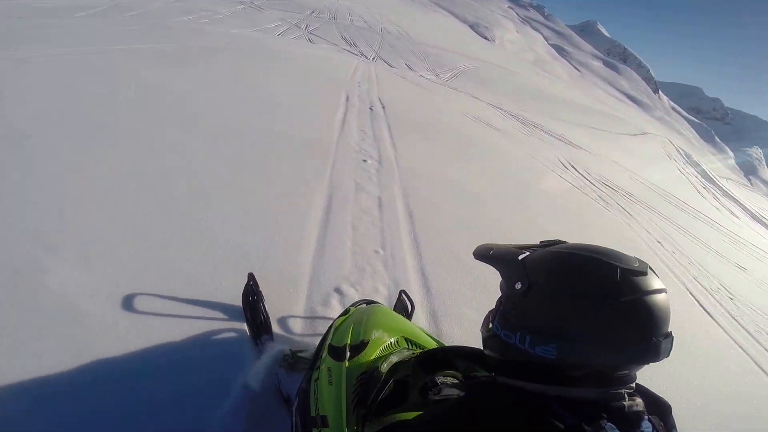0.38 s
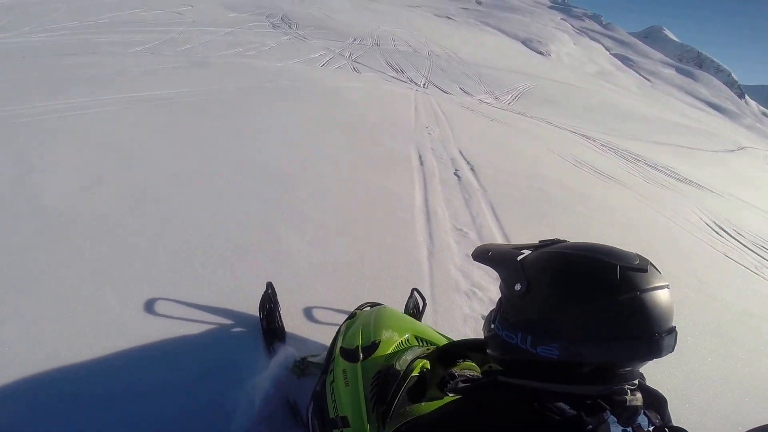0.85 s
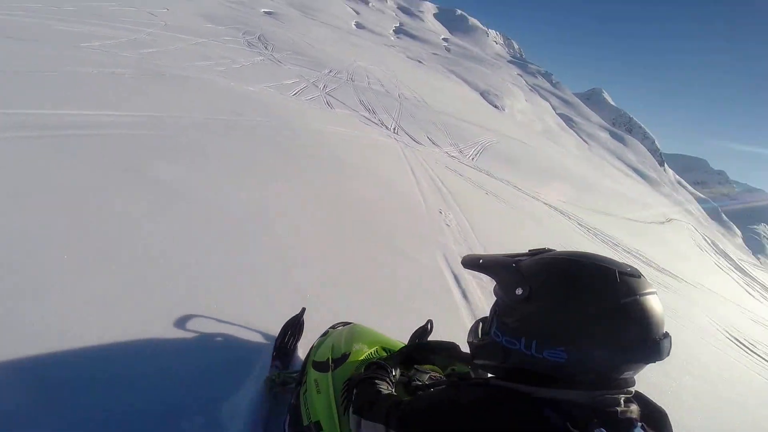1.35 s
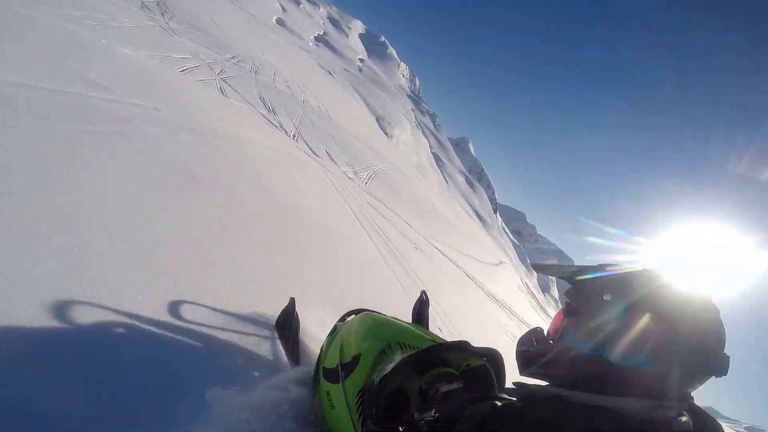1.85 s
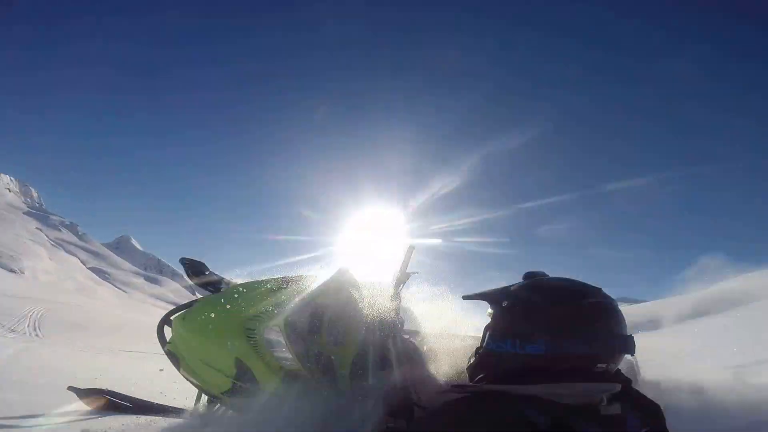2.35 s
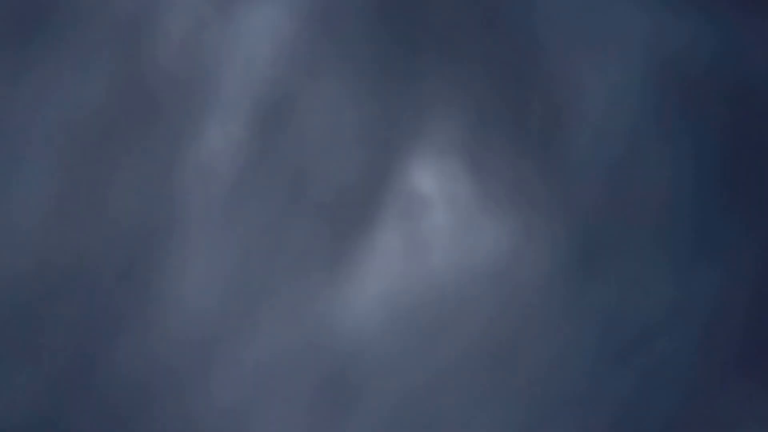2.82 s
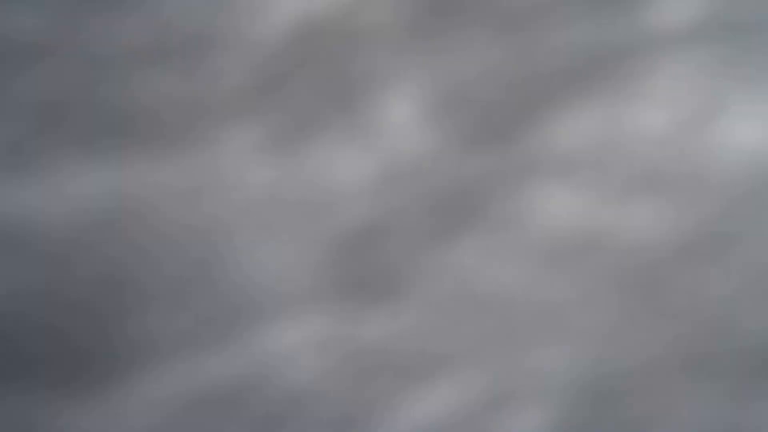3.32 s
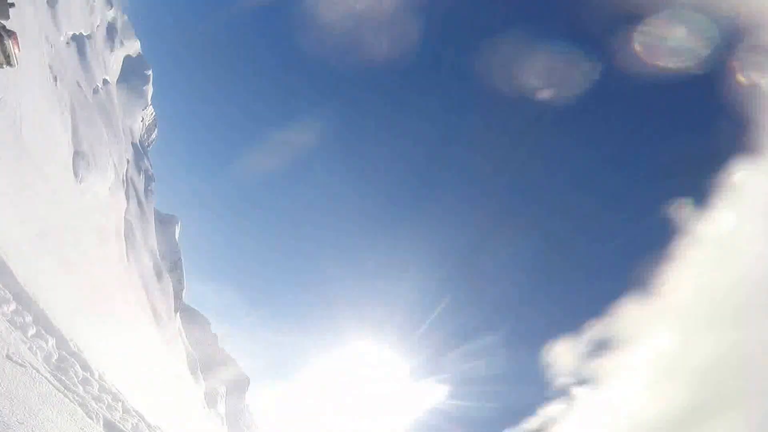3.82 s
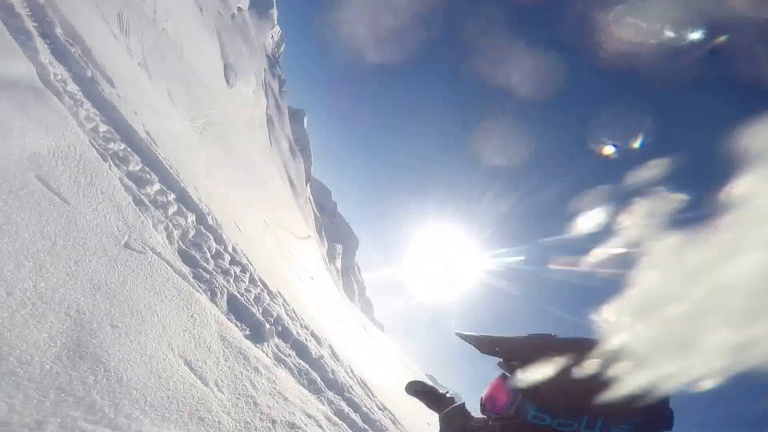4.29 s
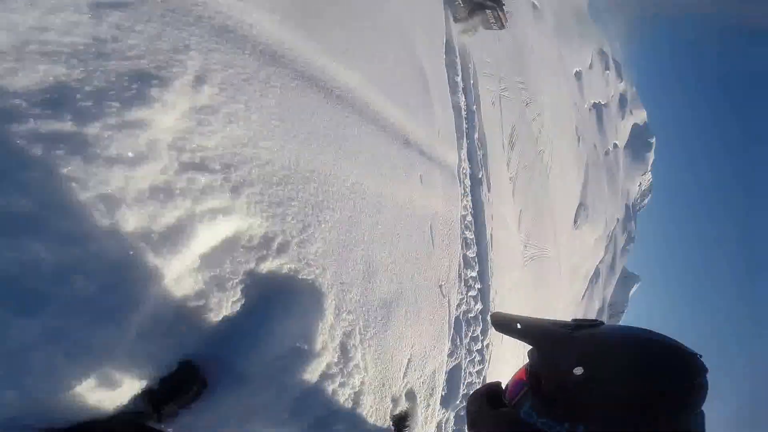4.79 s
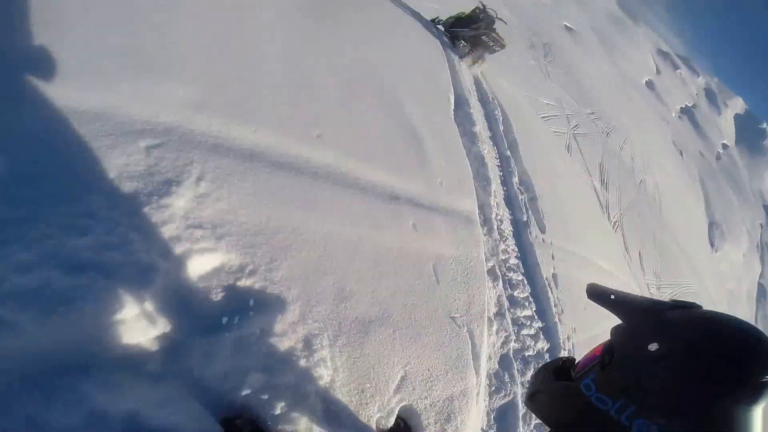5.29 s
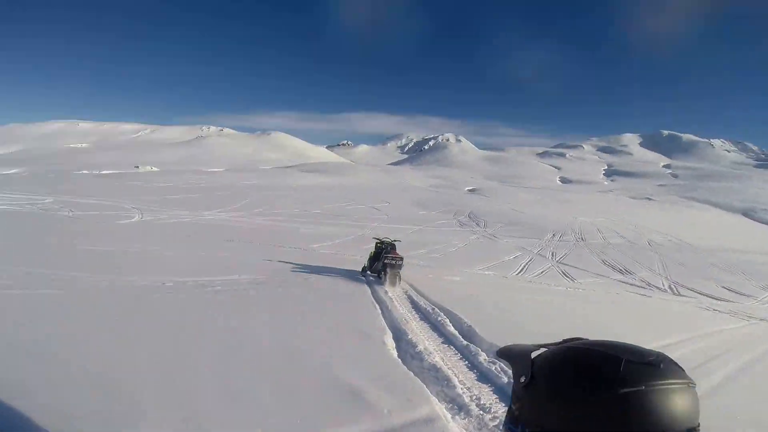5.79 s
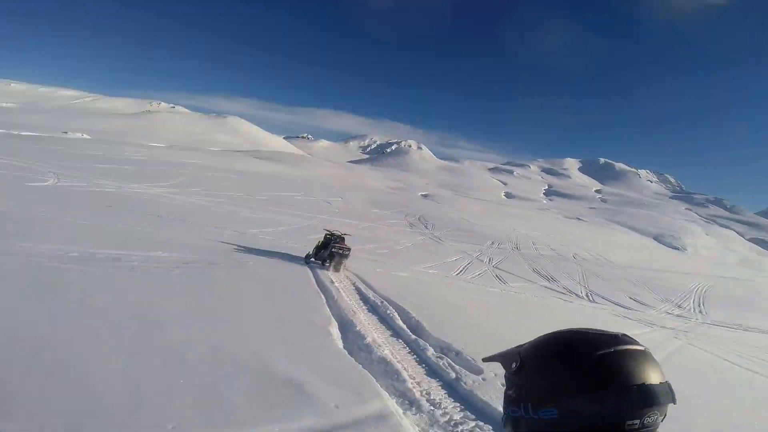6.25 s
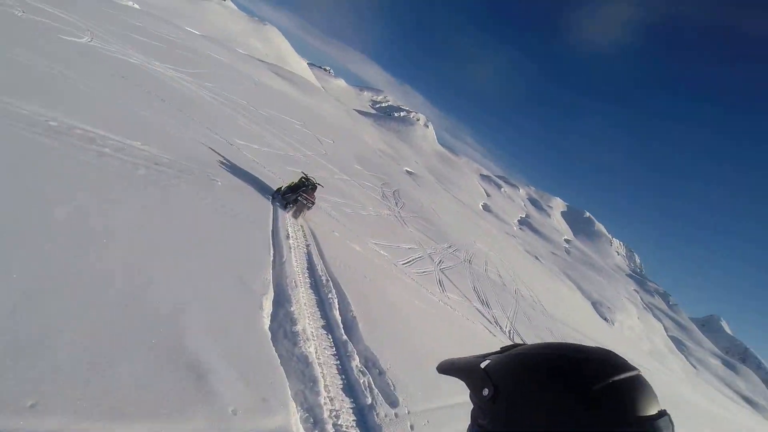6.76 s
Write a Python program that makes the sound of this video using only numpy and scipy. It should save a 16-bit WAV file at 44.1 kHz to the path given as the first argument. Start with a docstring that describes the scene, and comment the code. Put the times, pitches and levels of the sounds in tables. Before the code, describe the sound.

A snowmobile engine drones, then revs up hard before heavy blows and a scraping plunge into snow, followed by muffled rubbing, thuds and small ticks.

```python
"""An engine drones and revs up, blows and a scraping plunge into snow follow, then jolts, rubbing, creaks and ticks.
A small camera in a plastic housing rides on a snowmobile driver's back; the driver falls and it ploughs into snow.
The engine is a sum of crank orders with hiss; friction and jolts are grainy noise ringing resonant modes.
Ticks and blows are decaying sines, snow is coloured noise, and powder trickles off afterwards."""
import sys
import numpy as np
from scipy import signal
from scipy.fft import rfft, irfft, next_fast_len
from scipy.io import wavfile
from scipy.ndimage import uniform_filter1d

SR = 44100
rng = np.random.default_rng(int(sys.argv[2]) if len(sys.argv) > 2 else 0)


def store_pcm(level_fs):
    """Save levels as 16-bit WAV."""
    pcm = np.round(np.clip(level_fs, -1, 1) * 32767).astype(np.int16)
    wavfile.write(sys.argv[1], SR, np.atleast_2d(pcm).T)


def decibels_to_gain(level_db):
    """Convert a level in decibels to a linear amplitude gain (20 dB per decade)."""
    exponent = np.asarray(level_db, float) / 20
    return 10 ** exponent


N = 314419
T = np.arange(N) / SR

# the plunge into the snow: crushing begins, the microphone is stopped, it clears (s)
CRUSH_S, STOPPED_S, CLEAR_S = 2.572, 2.597, 2.622
# resonances of the camera mount: hz, width_hz, level_db (relative)
MOUNT_MODES = [(120.3, 59, -6), (212.7, 69, 1), (346.7, 62, -9), (533, 62, -13.5)]
# resonances of the plastic housing: hz, width_hz, level_db (relative)
HOUSING_MODES = [(445, 160, -11), (1110, 230, -9), (1480, 100, -5.5), (1960, 194, 0), (2208, 117, -2.5),
                 (2370, 140, 1), (2469, 310, -3.5), (2740, 1020, -11), (3790, 350, -15), (4630, 330, -15),
                 (5500, 400, -25.5), (9600, 900, -41)]


def evened(x):
    """Normalises the mean power: scales to rms 1."""
    return x / np.sqrt(np.mean(x ** 2) + 1e-20)


def coloured(x, points):
    """Spectral shaping: weights the spectrum by (Hz, dB) points on a log frequency axis, at rms 1."""
    point_hz, point_db = np.transpose(points)
    size = next_fast_len(len(x))
    hz = np.arange(size // 2 + 1) * SR / size
    weight_db = np.interp(np.log(hz + 1), np.log(point_hz + 1), point_db)
    return evened(irfft(rfft(x, size) * decibels_to_gain(weight_db), size)[:len(x)])


def ring(x, hz, width):
    """Damped resonance: one pole applied twice, so that the valleys between modes stay dark."""
    pole = np.exp((2j * np.pi * hz - np.pi * width) / SR)
    return 2 * signal.lfilter([(1 - abs(pole)) ** 2], np.poly([pole, pole]), x).real


def gritty(per_s, spread_db, smooth):
    """Granular excitation: random impulses of uneven size over a smooth share of noise."""
    sizes = decibels_to_gain(spread_db * np.minimum(rng.exponential(1, N), 4))
    grains = (rng.random(N) < per_s / SR) * sizes
    return evened(grains * rng.standard_normal(N)) + smooth * rng.standard_normal(N)


def lumps(hz, depth_db):
    """Random amplitude modulation: a gain gliding between hz random values a second."""
    steps = rng.standard_normal(1000)
    return decibels_to_gain(depth_db * np.interp(T * hz, np.arange(len(steps)), steps))


def played(tables):
    """Level envelope: joins tables of (s, dB) into a gain, silent outside each of them."""
    s, db = np.transpose(np.vstack(tables))
    inside = sum((T >= rows[0][0]) & (T < rows[-1][0]) for rows in tables)
    return decibels_to_gain(np.interp(T, s, db)) * uniform_filter1d(1. * inside, size=60)


def swells(rows, hold, peak_at=None):
    """Incoherent addition: rows swell and die, flatter with more hold; other columns blend by power."""
    start, length, db, *rest = np.transpose(rows)[:, :, None]
    if peak_at is None:
        peak_at = rest.pop(0)
    coarse = T[::64]
    warp = np.log(.5) / np.log(np.clip(peak_at, .05, .95))  # puts the peak at its share of the length
    phase = np.clip((coarse - start) / length, 0, 1) ** warp
    power = decibels_to_gain(2 * db) * np.sin(np.pi * phase).clip(0) ** (2 / hold) + 1e-12
    total = power.sum(0)
    curves = [np.sqrt(total)] + [(power * c).sum(0) / total for c in rest]
    return [np.interp(T, coarse, c) for c in curves]


def strokes():
    """Sliding contact: pressure and brightness of the rubbing, over a light touch after the plunge."""
    # strokes of clothing and snow along the housing:
    # start_s, length_s, level_db, peak_at (share of the length 0-1), tilt_db (brightness per octave)
    rubs = [(1.98, 0.29, -30.5, 0.51, 0), (2.24, 0.24, -36.5, 0.48, -6), (2.455, 0.044, -20.5, 0.51, 2),
            (2.49, 0.093, -22, 0.3, 1), (3.42, 0.29, -43, 0.32, 7.5), (3.74, 0.087, -39.5, 0.73, 8),
            (3.83, 0.16, -38, 0.43, 3), (4.01, 0.16, -36, 0.56, -0.5), (4.17, 0.27, -30.5, 0.62, 2),
            (4.47, 0.19, -41.5, 0.45, -6), (4.64, 0.29, -45.5, 0.42, -4), (4.79, 0.16, -39.5, 0.51, -1),
            (4.94, 0.21, -36.5, 0.5, 4), (5.3, 0.2, -45, 0.39, -4), (5.46, 0.18, -38, 0.62, -11.5),
            (5.53, 0.15, -27.5, 0.57, 3.5), (5.63, 0.14, -29, 0.6, 3), (5.76, 0.86, -43, 0.25, -3.5),
            (5.96, 0.22, -29.5, 0.3, -1), (6.203, 0.15, -36.5, 0.04, 0), (6.24, 0.31, -29.5, 0.62, 0.5),
            (6.5, 0.18, -35.5, 0.56, -1.5), (6.71, 0.14, -44, 0.77, 1), (6.92, 0.19, -37, 0.69, 0)]
    touch_tilt_db = -3  # per octave
    level, tilt_db = swells(rubs, hold=0.89)
    touch = decibels_to_gain(-51.5) * (T > CLEAR_S)
    stroke_share = level ** 2 / (level ** 2 + touch ** 2)
    return np.hypot(level, touch), touch_tilt_db + (tilt_db - touch_tilt_db) * stroke_share


def plough_pressure():
    """Contact pressure: the gain with which the camera ploughs through snow."""
    # how hard it ploughs: time_s, level_db
    plough_levels = [(2.604, -82), (2.62, -24), (2.624, -24), (2.74, -24), (2.81, -20), (2.96, -14),
                     (3.13, -18), (3.15, -33), (3.17, -21), (3.27, -16.5), (3.375, -16), (3.39, -25.5),
                     (3.5, -33.5), (3.54, -47)]
    return played([plough_levels])


def self_noise():
    """Electronic noise floor: steady whine tones over coloured hiss."""
    # camera electronics: hz, level_db (rms, before any later sinking)
    whine_tones = [(8780, -81), (11705, -81), (14626, -85)]
    # spectrum of the hiss: hz, level_db (relative, per Hz)
    floor_tone = [(300, 14.5), (3000, -24), (8000, -17), (12000, -21), (15000, -31), (15600, -60)]
    whine = sum(decibels_to_gain(db) * np.sqrt(2) * np.sin(2 * np.pi * hz * T) for hz, db in whine_tones)
    return whine + decibels_to_gain(-54.5) * coloured(rng.standard_normal(N), floor_tone)


def engine():
    """Harmonic synthesis: wavering crank orders through pipe resonances, and hiss that puffs once a turn."""
    # running of the engine: time_s, crank_hz, gain_db (of the summed orders), throttle (0-1)
    engine_run = [(0, 75.1, -54, 0.36), (.73, 73.5, -54.5, 0.3), (.85, 72.2, -59, 0.0),
                  (1.1, 67.9, -58, 0.1), (1.42, 68.5, -58, .3), (1.619, 73.3, -45.5, 0.95),
                  (1.75, 80.25, -47, 0.92), (1.85, 88.8, -52.5, 0.77), (1.951, 94.1, -47, 0.89),
                  (2.04, 96.8, -50, 1), (2.1, 94.2, -83, 0.57)]
    # exhaust note: order (multiple of the crank rate), level_db (relative)
    order_levels = [(1, -5.5), (2, 9.5), (3, 3), (4, 5.5), (5, -5.5), (6, -2), (7, -8.5), (8, 1.5),
                    (9, -10), (10, -16), (11, -3), (12, -7.5), (13, -12), (14, -13), (15, -18), (16, -11.5)]
    # the exhaust pipe favours one region: hz, gain_db
    pipe = [(70, 13.5), (250, -5), (350, 8.5), (450, 8), (520, 0), (620, -16), (900, -17.5)]
    # an open throttle drives pipe and airbox into resonance: hz, gain_db (added at full throttle)
    open_pipe = [(120, -11.5), (250, -4), (380, -1.5), (470, 6), (600, 5), (900, 0), (1120, 36), (1500, 18)]
    # spectrum of the hiss: hz, level_db (relative, per Hz)
    hiss_tone = [(400, -10), (1300, -7), (1620, 1.5), (1970, -7), (2480, -0.5), (2800, -7.5), (4650, -3),
                 (5400, -12), (6500, -10.5), (7400, -23), (9500, -19.5), (10800, -30), (15000, -38.5),
                 (15600, -81)]
    # hiss of intake, belt and track, near and later running away: time_s, level_db (before a 7.5 dB lift)
    roar = [
        [(0.0, -43.5), (0.49, -42.5), (1.35, -47.5), (1.71, -42.5), (1.93, -36.5), (2.18, -42.5), (2.45, -42.5),
         (2.57, -57)],
        [(3.62, -65.5), (4.23, -61), (7.13, -70)],
    ]
    s, *columns = np.transpose(engine_run)
    crank_hz, note_db, throttle = (np.interp(T, s, c) for c in columns)
    turns = np.cumsum(crank_hz * lumps(hz=35, depth_db=.055)) / SR  # uneven firings shake the speed
    note = np.zeros(N)
    for order, db in order_levels:
        order_hz = order * crank_hz
        pipe_db = np.interp(order_hz, *np.transpose(pipe))
        pipe_db += throttle * np.interp(order_hz, *np.transpose(open_pipe))
        wave = np.sin(2 * np.pi * (order * turns + rng.random()))
        note += decibels_to_gain(db + pipe_db) * lumps(hz=21.96, depth_db=3) * wave
    puffs = 1 + 0.1 * np.cos(2 * np.pi * turns) * (T < CRUSH_S)
    hiss = coloured(gritty(6000, 0.63, 0.95), hiss_tone) * puffs * lumps(hz=30.7, depth_db=0.86)
    return decibels_to_gain(note_db) * note + played(roar) * hiss * decibels_to_gain(7.5)


def creaks():
    """Stick-slip: quick uneven slips of a strap ring its buckle; fine ice fizzes with them."""
    # creaks: start_s, length_s, level_db (lower buckle mode), upper_db and fizz_db (over that mode)
    creak_rows = [(5.082, 0.076, -61.5, 14, -1), (5.77, 0.15, -49, -9, -43), (6.497, 0.02, -49, 16, -10)]
    # lower and upper mode of the buckle: hz, width_hz
    buckle_modes = [(1458, 15), (3736, 280)]
    level, upper_db, fizz_db = swells(creak_rows, peak_at=0.3, hold=1.9)
    slips = gritty(500, 3., .3)
    low, upper = (evened(ring(slips, hz, width)) for hz, width in buckle_modes)
    fizz = evened(ring(gritty(3000, 4.6, 0.39), hz=12600, width=1800))
    return level * (low + decibels_to_gain(upper_db) * upper + decibels_to_gain(fizz_db) * fizz)


def jolts():
    """Forced vibration: lumpy low thuds and steady shaking; the same lumps swell the ringing of the mount."""
    # jolts through the mount: start_s, length_s, thud_db, ring_db (mount over the thud)
    jolt_rows = [(.38, 0.069, -32.5, -25), (.57, 0.16, -36, -6.5), (.78, 0.21, -31.5, -10.5),
                 (1.0, 0.1, -34, -14), (1.25, 0.23, -30.5, -39), (1.39, 0.077, -21, -15),
                 (1.46, 0.075, -30, -21), (1.92, 0.069, -34.5, 5), (2.1, 0.22, -25.5, -8),
                 (2.28, 0.16, -18, -9.5), (2.42, 0.17, -14.5, -14), (2.57, 0.047, -18.5, 9),
                 (2.84, 0.041, -15, -6), (3.36, 0.13, -21.5, -5), (4.05, 0.17, -25, -10.5),
                 (4.15, 0.11, -28, -27), (4.57, 0.13, -30.5, -21), (4.68, 0.13, -32.5, -10.5),
                 (4.84, 0.107, -28, -7), (5.38, 0.081, -36, -22), (5.47, 0.1, -36, 2.5),
                 (5.83, 0.2, -33.5, -18), (5.97, 0.051, -28, 3), (6.05, 0.07, -25, -36),
                 (6.3, 0.034, -28.5, 3.5), (6.56, 0.12, -24, -12), (6.71, 0.13, -34, -22),
                 (6.92, 0.12, -40.5, -17)]
    # spectrum of the steady shaking: hz, level_db (relative, per Hz)
    shake_tone = [(8, 1.5), (30, -6), (62, 5), (100, -9), (150, -12), (300, -67)]
    # spectrum of a jolt, which swings deeper: hz, level_db (relative, per Hz)
    jolt_tone = [(8, -2.5), (30, 1.5), (55, 3.5), (85, -4), (140, -40), (300, -74)]
    jolt, ring_db = swells(jolt_rows, peak_at=0.41, hold=0.92)
    still = decibels_to_gain(np.where(T < CRUSH_S, -38, -43.5))  # riding, then at rest
    rub_shake = decibels_to_gain(1) * strokes()[0]
    plough_shake = decibels_to_gain(-11.5) * plough_pressure()
    shaking = np.sqrt(still ** 2 + rub_shake ** 2 + plough_shake ** 2)
    grains = gritty(300, 2.9, 0.5)
    modes = [decibels_to_gain(db) * lumps(hz=13, depth_db=0.5) * evened(ring(grains, hz, width))
             for hz, width, db in MOUNT_MODES]
    bright = evened(sum(modes))
    # a jolt rings the low modes most: -6.5 dB per octave
    dull = evened(sum(decibels_to_gain(-6.5 * np.log2(row[0] / 200)) * x for row, x in zip(MOUNT_MODES, modes)))
    jolted = jolt * (coloured(rng.standard_normal(N), jolt_tone) + decibels_to_gain(ring_db) * dull)
    shaken = shaking * (coloured(rng.standard_normal(N), shake_tone) + decibels_to_gain(-6.5) * bright)
    return evened(lumps(hz=24.2, depth_db=3)) * (jolted + shaken)


def rubbing():
    """Friction-driven resonance: clumped grains ring the housing; brighter strokes lift its upper modes."""
    level, tilt_db = strokes()
    grains = gritty(1500, 5.0, 0.79) * lumps(hz=49.1, depth_db=1.0)
    grains = coloured(grains, [(7000, -1), (12000, -37)])  # the plastic wall passes little of the top
    rung = np.zeros(N)
    for hz, width, db in HOUSING_MODES:
        wander = lumps(hz=20, depth_db=2.5)  # the point of contact wanders, so each mode swells on its own
        rung += decibels_to_gain(db + tilt_db * np.log2(hz / 2000)) * wander * evened(ring(grains, hz, width))
    return level * rung * decibels_to_gain(-7)


def ticks():
    """Impulse response: a tick rings modes near its loudest region and snaps in air; ice only snaps."""
    # ticks on the housing: time_s, peak_db, centre_hz (loudest region), upper_db (upper modes, before +2.5 dB)
    tick_rows = [(1.4273, -23, 2198, -30), (2.475, -15, 2450, -28), (2.498, -14.5, 2170, -25),
                 (2.507, -12, 1250, -22), (2.522, -15, 2000, -26), (2.5875, -1, 2300, -20),
                 (2.925, -0.5, 1810, -31), (3.799, -24, 2280, -12), (3.852, -34, 2320, -25),
                 (4.2923, -18.5, 2370, -27), (4.348, -16.5, 2230, -26), (4.5707, -29, 1480, -30),
                 (4.584, -15, 1990, -13.5), (4.9688, -27, 2290, -23), (5.006, -33, 2060, -19),
                 (5.3981, -35, 2260, -21), (5.4942, -33.5, 2370, -30), (5.539, -29, 2280, -23),
                 (5.673, -20, 1970, -21), (5.8442, -30.5, 2370, -8), (5.865, -32, 1450, 5),
                 (5.926, -35, 1100, -19), (5.9778, -22, 2370, -19), (6.1, -24.5, 2530, -9),
                 (6.107, -22, 1480, -14), (6.1278, -23, 1480, -13), (6.212, -32, 2420, -13),
                 (6.305, -26.5, 1420, -43), (6.5061, -24, 2170, 6), (6.606, -27, 2000, -27),
                 (6.648, -34, 2210, -25), (6.734, -35, 2400, -34), (6.797, -29, 1915, -22),
                 (6.848, -34, 2280, -20), (6.977, -24.5, 1740, -27), (7.0306, -25.5, 2220, -28)]
    # grains of ice snapping near the microphone port: time_s, peak_db
    snap_rows = [(3.806, -26), (4.1346, -18), (4.1704, -30), (4.186, -33), (6.128, -45), (6.21, -47),
                 (6.3213, -41), (6.978, -39)]
    out, t = np.zeros(N + 1500), np.arange(1500) / SR
    rise = np.sin(np.pi / 2 * np.minimum(t / 0.0018, 1)) ** 2

    def peak(x):
        """Normalises the peak to 1."""
        return x / abs(x).max()

    def snap(noise):
        """Broad resonance: a noise burst dying within milliseconds."""
        return peak(ring(noise * np.exp(-t / 0.0013), hz=5400, width=7100))

    for s, db, centre_hz, upper_db in tick_rows:
        noise = rng.standard_normal(len(t))
        rung = []
        for (hz, width, _), chance in zip(HOUSING_MODES, noise):
            decay = np.exp(-np.pi * np.clip(width, 130, 190) * t)
            detuned_hz = hz * (1 + 0.026 * chance)
            rung.append((hz, decay * np.sin(2 * np.pi * detuned_hz * t)))
        # modes weaken by so many dB per octave away from the centre
        low = sum(decibels_to_gain(-18 * abs(np.log2(hz / centre_hz))) * x for hz, x in rung if hz < 2800)
        upper = sum(decibels_to_gain(-36 * abs(np.log2(hz / 3950))) * x for hz, x in rung if 2800 < hz < 5000)
        sound = peak(low) + decibels_to_gain(upper_db + 2.5) * peak(upper)
        sound = sound + decibels_to_gain(-41) * snap(noise)  # the part that comes through the air
        out[round(s * SR):][:len(t)] += decibels_to_gain(db) * peak(sound * rise)
    for s, db in snap_rows:
        out[round(s * SR):][:len(t)] += decibels_to_gain(db) * snap(rng.standard_normal(len(t)))
    return out[:N]


def blows():
    """Damped oscillation: each blow swings the whole housing briefly and leaves a mount mode ringing."""
    # heavy blows: time_s, level_db, swing_hz, swings (cycles until the swing is down to 1/e), ring_db (mount)
    blow_rows = [(1.402, -21, 44.3, 0.82, -29), (2.448, -5, 37.3, 2.2, -43), (2.486, -0.5, 43, 1.07, -7),
                 (2.52, -2, 48, 1.2, -10), (2.5845, 2, 152, 0.61, -19), (5.966, -13, 47.6, 2, -6)]
    out = np.zeros(N)
    mount_hz, width, _ = MOUNT_MODES[1]
    for s, db, hz, swings, ring_db in blow_rows:
        t = np.maximum(T - s, 0)
        out += decibels_to_gain(db) * np.sin(2 * np.pi * hz * t) * np.exp(-(hz * t / swings) ** 2)
        mount = np.sin(2 * np.pi * mount_hz * t) * np.exp(-.42 * np.pi * width * t)
        out += decibels_to_gain(ring_db) * mount * np.minimum(t / 0.0092, 1)
    return out


def plunge():
    """Granular fracture: a short wide-band crush of snow as the camera goes in."""
    tone = [(200, 7.0), (2000, 4.0), (6000, -3.0), (12000, -11.5), (15800, -17), (16300, -62)]  # (Hz, dB)
    crush = coloured(gritty(4200, 3.9, 0.91), tone)
    return crush * decibels_to_gain(-14) * (T > CRUSH_S) * np.clip((STOPPED_S - T) / 0.009, 0, 1)


def snow():
    """Granular friction: packed snow scrapes and crunches past, treble in surges; powder trickles off."""
    # spectrum of the shallow scrape: hz, level_db (relative, per Hz)
    scrape_tone = [(150, -12.5), (250, -32), (430, -18), (669, -30), (945, -26), (1050, -26), (1510, -5),
                   (2020, -4.5), (2200, 3.5), (2950, -15.5), (3800, -13), (4250, -18), (4710, -13.5),
                   (5220, -20.5), (12200, -33), (15500, -42)]
    # spectrum of the deeper crunch: hz, level_db (relative, per Hz)
    crunch_tone = [(150, -2.5), (250, -0.5), (378, -2.5), (405, 0), (442, -1.5), (646, -0.5), (2240, 0),
                   (4170, -17), (6100, -17.5), (12400, -35), (15500, -40)]
    # loose powder sliding off: start_s, length_s, level_db, peak_at (share of the length 0-1)
    powder_rows = [(2.73, 0.093, -30, 0.74), (3.37, 0.069, -29.5, 0.15), (3.45, 0.14, -38, 0.33),
                   (3.75, 0.076, -41.5, 0.69), (3.81, 0.19, -45.5, 0.37), (3.9, 0.15, -54, 0.46),
                   (4.07, 0.17, -48, 0.41)]
    # spectrum of the powder: hz, level_db (relative, per Hz)
    powder_tone = [(2500, 1), (5000, 6.5), (8000, 1), (11000, -2.5), (13000, -5.5), (15000, -10),
                   (15600, -46)]
    pressure = plough_pressure()
    deep = np.where((T > 3.15) & (T < 3.385), 0.96, 0.13)  # power share of the crunch
    grains = gritty(3000, 2.8, 0.92) * lumps(hz=59.5, depth_db=1.0)
    scrape = np.sqrt(1 - deep) * coloured(grains, scrape_tone)
    plough = scrape + np.sqrt(deep) * coloured(grains[::-1], crunch_tone)
    treble = signal.sosfilt(signal.butter(2, 5200, "high", fs=SR, output="sos"), plough)
    plough = plough + (lumps(hz=30, depth_db=3.0) - 1) * treble
    # a lower scrape joins under pressure
    body = evened(ring(plough, hz=1320, width=670)) * lumps(hz=14, depth_db=4.0)
    plough = plough + body * pressure * (1 - deep) * decibels_to_gain(3.0)
    powder = coloured(gritty(2300, 0.89, 1.0) * lumps(hz=69.0, depth_db=2.0), powder_tone)
    return pressure * plough + swells(powder_rows, hold=.4)[0] * powder


def scene():
    """Acoustic blockage: all but the ploughing and powder sinks by 33 dB while snow stops the microphone."""
    stopped = (T > STOPPED_S) * np.clip((CLEAR_S - T) / 0.027, 0, 1)
    open_port = decibels_to_gain(-33 * uniform_filter1d(stopped, size=100))
    through_port = engine() + creaks() + jolts() + rubbing() + ticks() + blows() + plunge()
    return (open_port * through_port + snow())[None]


def band_limit(x):
    """A steep low-pass at the top of the band."""
    return signal.sosfilt(signal.butter(12, 16260, fs=SR, output="sos"), x)


def record(dry):
    """Level-dependent noise floor, overload and band limit: self-noise sinks after loud sound."""
    power_db = 10 * np.log10(abs(uniform_filter1d(dry[0] ** 2, size=4000)) + 1e-12)
    fall = T * 7.  # the held level falls this many dB a second
    held_level_db = np.maximum.accumulate(power_db + fall) - fall
    excess_db = np.maximum(held_level_db + 21, 0)
    noise = self_noise() * decibels_to_gain(-2 * excess_db)
    overloaded = np.clip(dry + noise, -1, 1)
    low_pass = signal.firwin(511, 15330, window=("kaiser", 7), fs=SR)
    limited = signal.oaconvolve(overloaded, low_pass[None], "same")
    return band_limit(np.clip(limited, -1, 1))


dry = scene()
out = record(dry)
store_pcm(out)
```